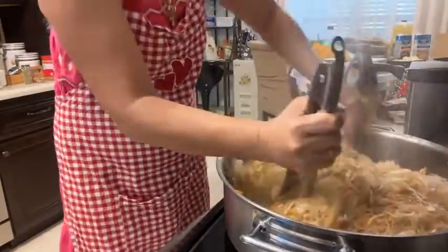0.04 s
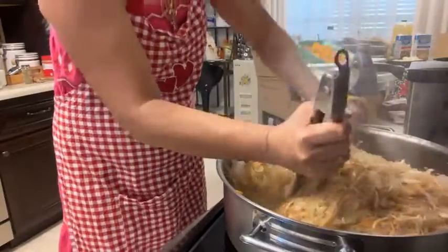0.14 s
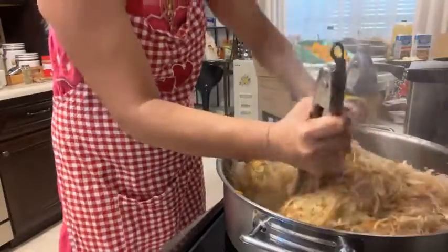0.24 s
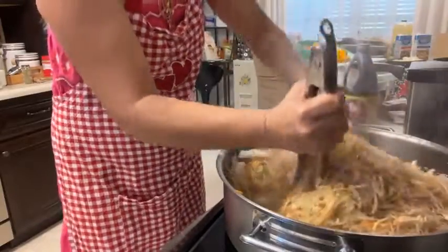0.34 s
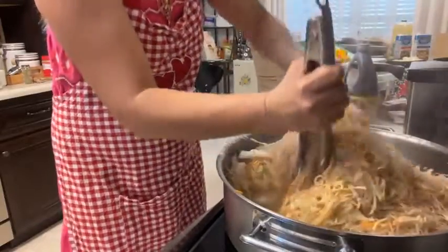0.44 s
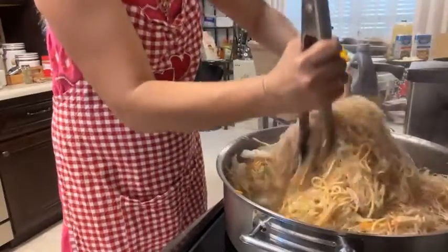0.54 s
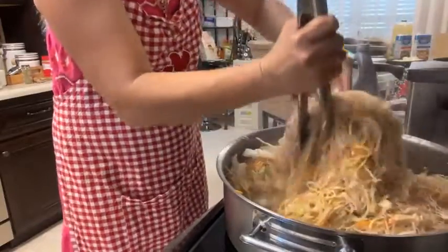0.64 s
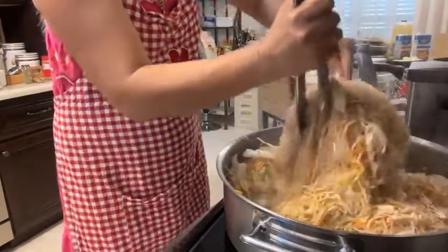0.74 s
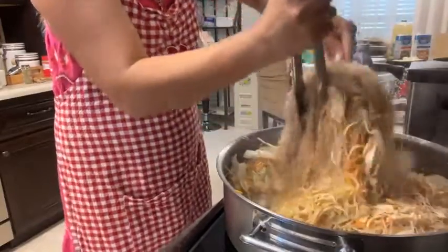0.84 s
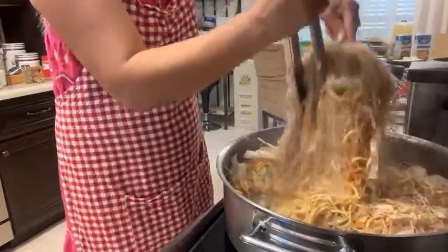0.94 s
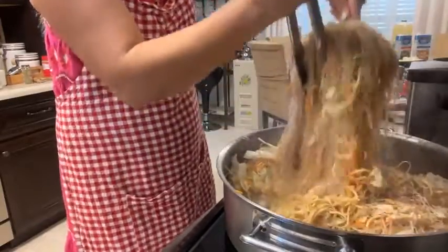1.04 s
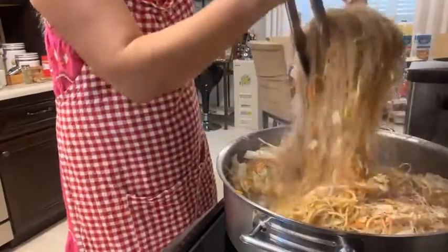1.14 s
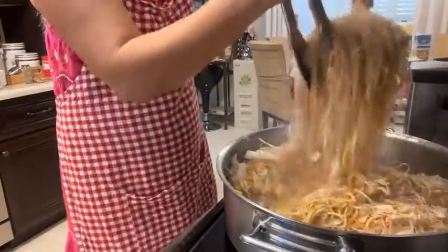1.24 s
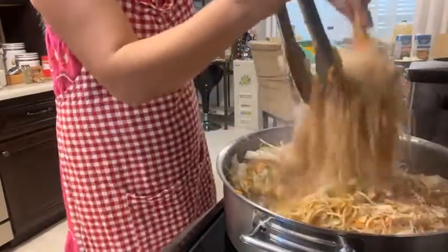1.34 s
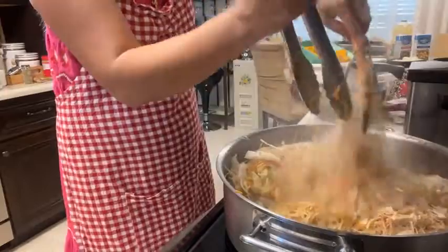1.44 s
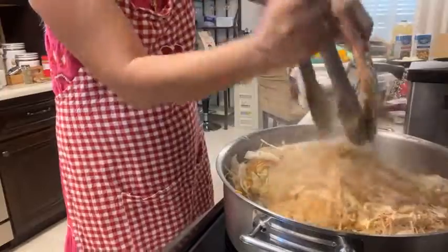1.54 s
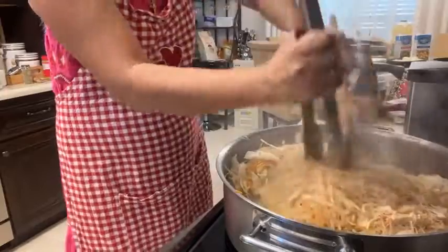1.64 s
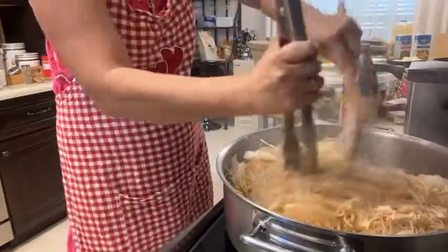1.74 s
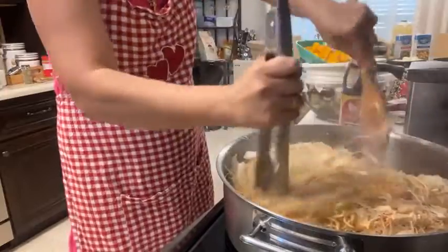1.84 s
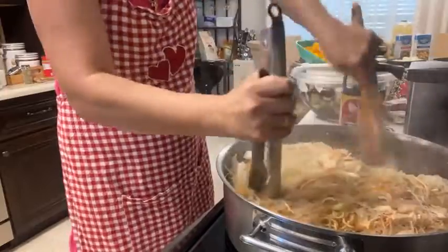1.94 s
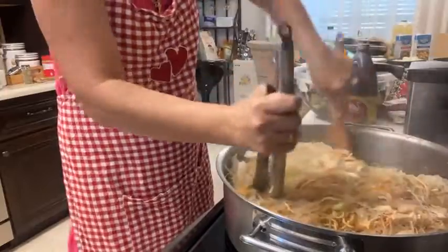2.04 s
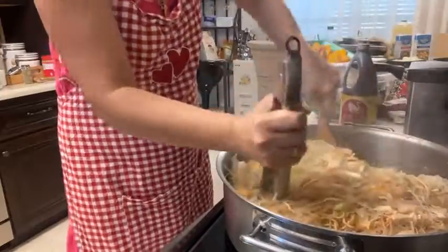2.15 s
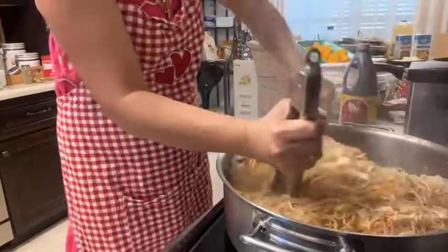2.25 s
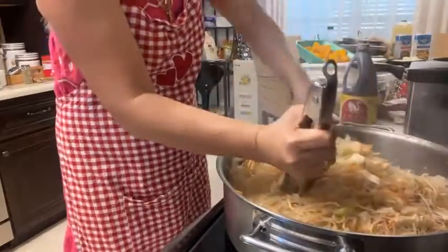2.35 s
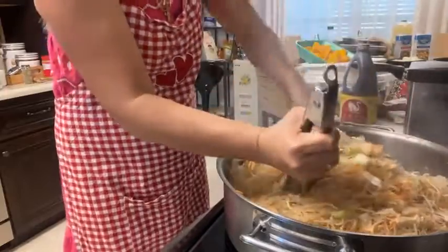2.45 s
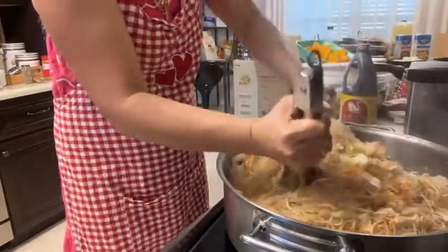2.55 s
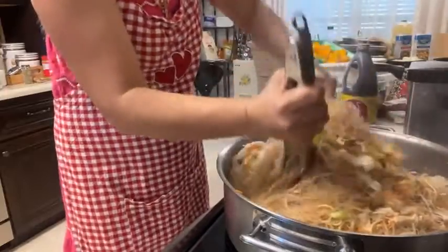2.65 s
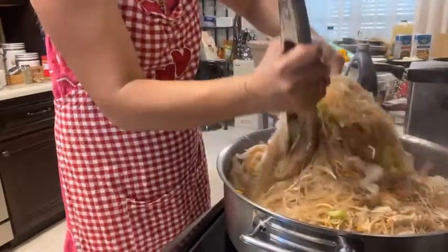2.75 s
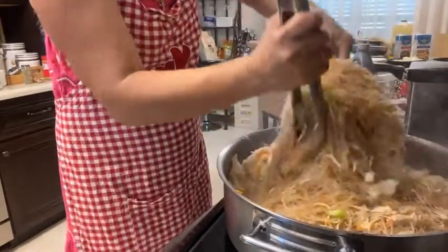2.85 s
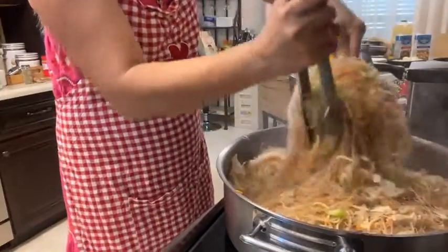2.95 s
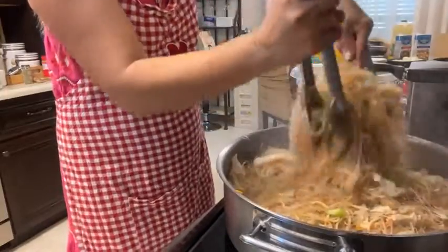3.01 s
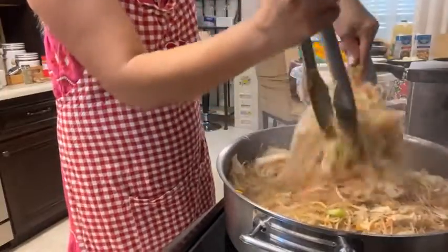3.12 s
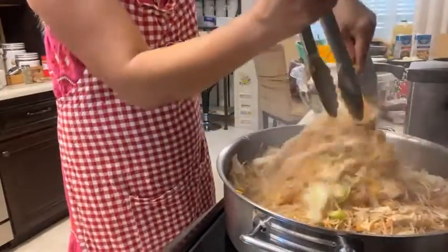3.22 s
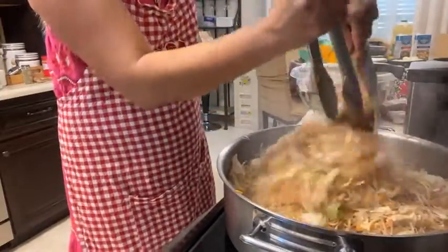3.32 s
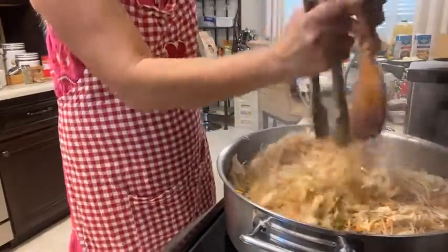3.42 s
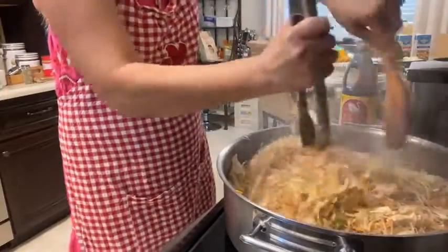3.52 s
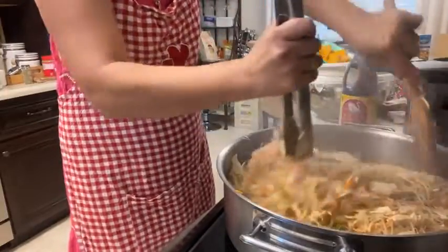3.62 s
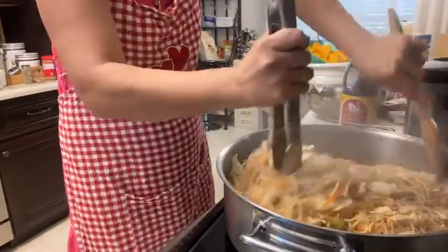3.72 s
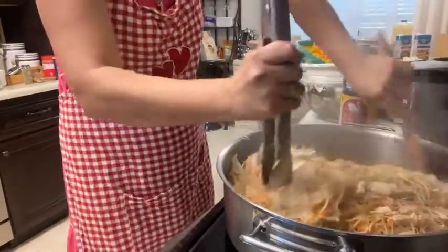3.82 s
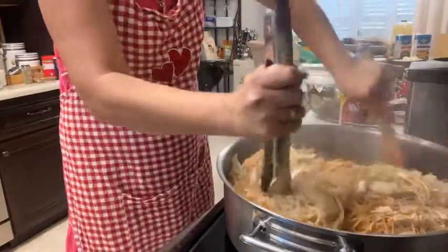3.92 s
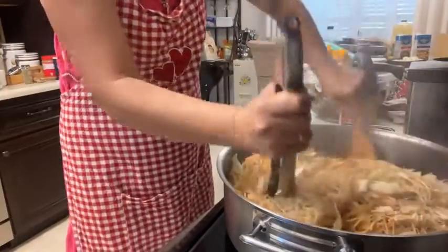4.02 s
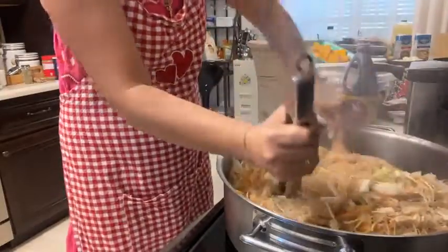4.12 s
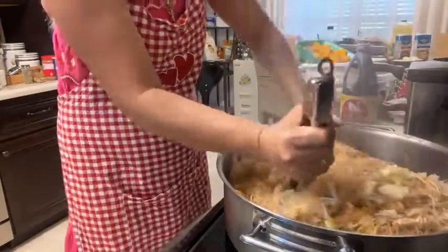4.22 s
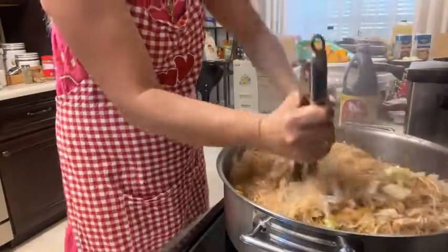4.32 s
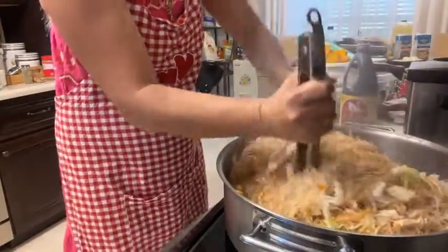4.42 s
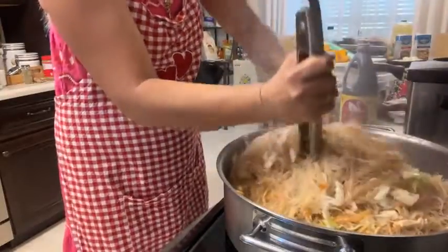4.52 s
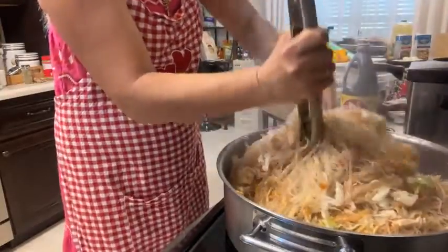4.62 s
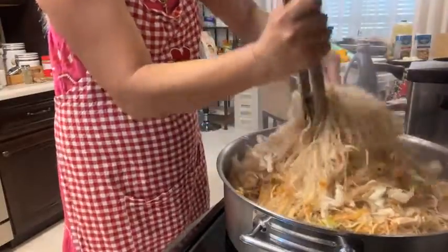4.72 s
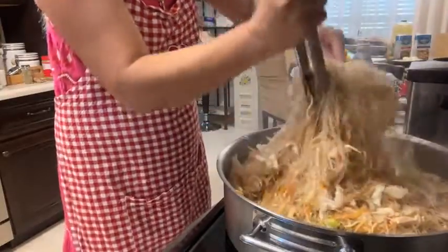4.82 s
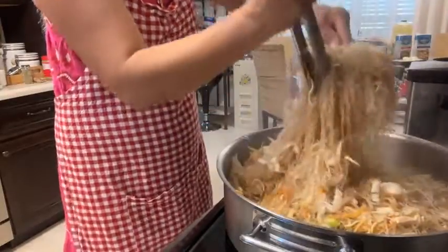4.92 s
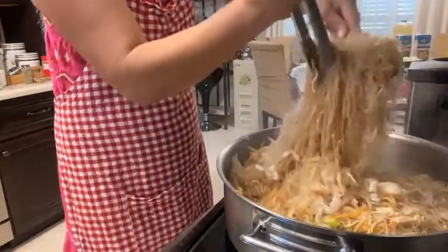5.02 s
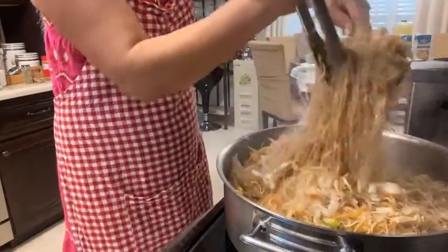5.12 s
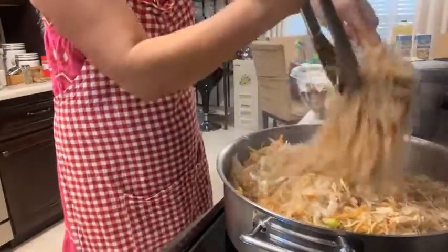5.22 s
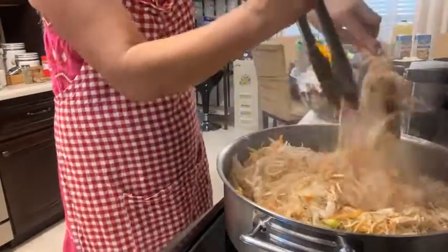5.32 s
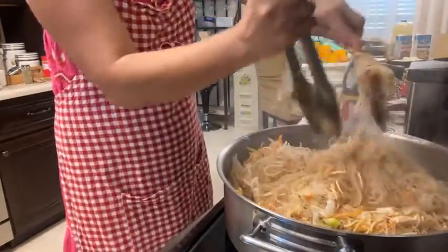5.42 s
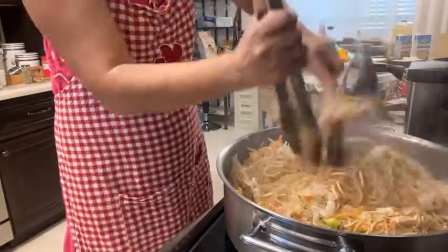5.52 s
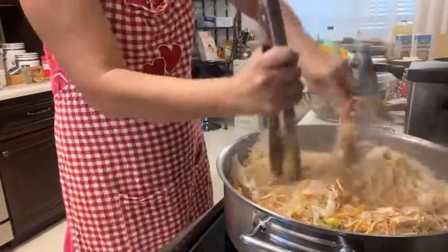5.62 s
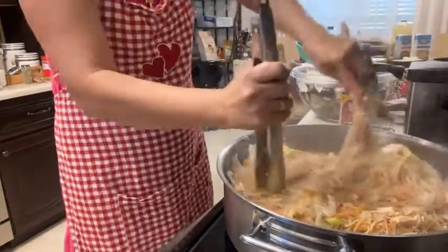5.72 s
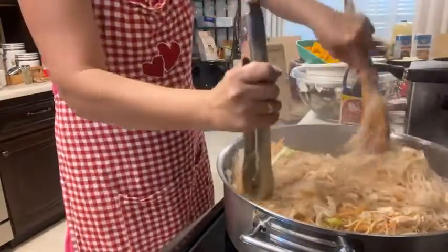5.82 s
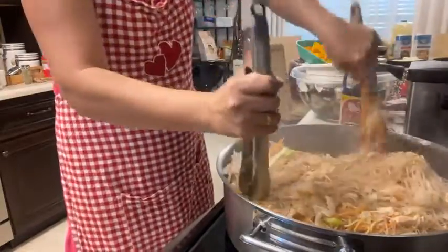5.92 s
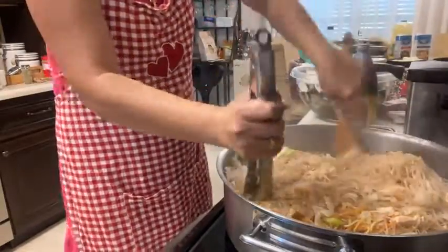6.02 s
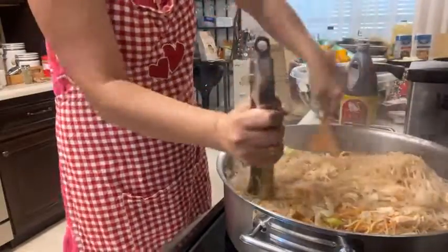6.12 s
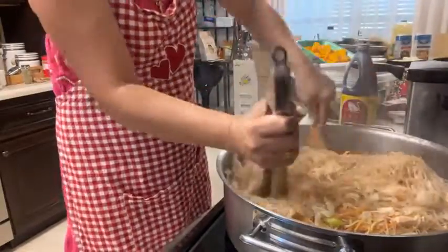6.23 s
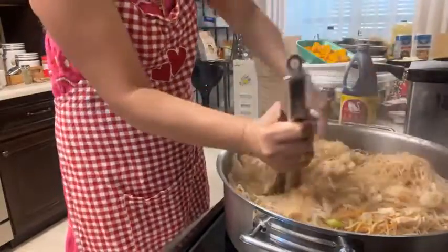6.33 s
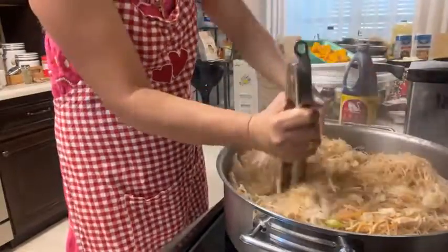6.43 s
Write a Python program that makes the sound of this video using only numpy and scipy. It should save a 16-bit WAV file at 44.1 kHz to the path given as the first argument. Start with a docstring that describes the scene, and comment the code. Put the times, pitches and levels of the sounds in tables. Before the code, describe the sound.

Metal tongs clank and scrape in a large steel pot, a wooden spatula knocks its wall, over steady sizzle and fan rush in a kitchen.

```python
"""Steel tongs toss noodles in a large steel pot: at each plunge they clank on the base, and a scrape follows.
Before two of the plunges a wooden spatula knocks on the wall; each blow makes the pot thump on its grate. Blows
are short bursts of noise plus dying sine waves; scrapes are rows of tiny random clicks. Between plunges the
tongs rattle lightly and the noodles squelch once. Filtered noise makes the fan rush and the rumble, fine clicks
the sizzle, and two steady tones beat as mains hum and a motor."""
import sys
import numpy as np
from scipy import signal
from scipy.fft import rfft, irfft, next_fast_len
from scipy.io import wavfile
from scipy.ndimage import uniform_filter1d

SR = 44100
rng = np.random.default_rng(int(sys.argv[2]) if len(sys.argv) > 2 else 0)


def unload_audio(sound):
    """Save the sound as a 16-bit wav file, at the path given as the first command line argument."""
    columns = np.transpose(np.atleast_2d(sound))
    # keep every value between -1 and 1, then stretch to whole-number steps
    steps = np.round(np.clip(columns, -1, 1) * 32767)
    wavfile.write(sys.argv[1], SR, steps.astype(np.int16))


N = 284886
TIME = np.arange(N) / SR  # seconds, whole scene
BLOW_TIME = TIME[:SR * 3 // 4]  # seconds, one blow

# tongs on the pot base: [t/s, level/dB, brightness/dB per octave, pot ring/dB,
# region favoured by the contact point f/Hz, its lift/dB, thump on the grate/dB]
BASE_CLANKS = [(0.0, -23.5, -1, 0.5, 754, 7.5, -26), (2.125, -9, -0.25, -7, 960, 4, -21.5),
               (4.2004, -23, 0.1, -8, 4300, 4.5, -39), (6.108, -15, 0.9, -12, 2940, 5, -24.5)]
# wooden spatula on the pot wall: same columns as the clanks
WALL_KNOCKS = [(2.0169, -13, 1, -1, 1255, 7, -25), (6.036, -20.5, -1, -0.5, 3000, 3, -34.5)]
# ways the pot rings: [f/Hz, level/dB, time to fall 60 dB/s, rise time/s]
POT_MODES = [(426, -3.5, 0.056, 0.0066), (388, -19, 0.07, 0.0016), (592, -26, 0.083, 0.0032),
             (642.4, -18.5, 0.22, 0.0019), (763, -28.5, 0.31, 0.0045), (861, -22, 0.35, 0.0096),
             (907, -26.5, 0.29, 0.0018), (1042, -14, 0.15, 0.00048), (1233, -20.5, 0.13, 0.0013),
             (1245, -13, 0.057, 0.0015), (1357, -49, .25, 0.0017), (1473, -21, 0.14, 0.00041),
             (2336, -34, 0.39, 0.0011)]
# dense short-lived vibrations of a steel contact: [f/Hz, level/dB, time to fall 60 dB/s]
STEEL_CRACK_BANDS = [(100, -15, 0.15), (393, 5.5, 0.053), (820, 1, 0.13), (1180, 2.5, 0.041),
                     (1910, -5, 0.09), (3700, -5, 0.042), (6760, -5.5, 0.04), (7900, -13, 0.049),
                     (11700, -17, 0.031), (13200, -8.5, 0.03), (15700, -23, 0.034)]
# the steel tips skip over each other: [t/s, level/dB, number of touches]
TIP_SKIPS = [(.208, -37.5, 1), (1.608, -40, 1), (3.388, -41, 3), (3.564, -46, 1)]
SKIP_S = 0.0265  # seconds from one touch to the next
TIP_TOP_HZ = 14000  # upper region in which the tips ring
# colour of frying and spitting fat: [f/Hz, level/dB]
FRYING_COLOUR = [(1000, -27.5), (2700, -9.5), (3500, -0.5), (4500, -2.5), (5500, -1), (7300, -4),
                 (8300, -10.5), (11000, -14.5), (13000, -8), (14500, -10), (16000, -16)]


def tongs(crack_db=18, steel_db=-1, snap_db=8, snap_s=0.00056):
    """Steel tips hit the base with a hard snap; the food damps the pot quickly."""
    # ways the tongs ring: [f/Hz, level/dB, time to fall 60 dB/s, rise time/s]
    tongs_modes = [(1240, -3.5, 0.026, 0.001), (2260, -6, 0.033, 0.00026), (2630, -8.5, 0.015, 0.000057),
                   (2890, -9, 0.022, 0.00045), (4740, -12, .04, 0.00031), (4730, -31, 0.06, 0.00019),
                   (5200, -22, 0.027, 0.00031), (6624, -18, 0.058, .0002), (6516, -16.5, 0.029, 0.00009),
                   (6950, -39, 0.065, .0002), (8500, -21, .04, .0002), (14400, -31, .01, 0.0003)]
    out = np.zeros(N)
    snap = amp(snap_db * np.exp(-BLOW_TIME / snap_s))  # extra loudness at the very start
    for s, db, bright_db, pot_db, centre_hz, lift_db, _ in BASE_CLANKS:
        crack = amp(crack_db) * snap * dying(STEEL_CRACK_BANDS, cycles=1.34)
        blow = crack + amp(steel_db) * ring(tongs_modes) + amp(pot_db) * ring(POT_MODES)
        blow = tilted(blow, bright_db, pivot_hz=1480)
        add(out, s, amp(db) * contact(blow, centre_hz, lift_db))
    return out


def spatula(crack_db=21, wood_db=-2, soft_hz=6500):
    """Wood cracks and rings briefly; the pot wall answers. The soft contact gives little top."""
    # ways the spatula rings: [f/Hz, level/dB, time to fall 60 dB/s, rise time/s]
    spatula_modes = [(429.5, -0.5, 0.04, 0.0127), (1029, 0.5, 0.082, 0.0098), (1051, -24, 0.12, 0.021),
                     (1124, -10, 0.053, 0.0021), (1304, -9, 0.024, 0.002), (1784, -8, .045, 0.0003),
                     (1890, -10, 0.056, 0.00042), (2460, -16.5, 0.13, 0.00092), (2644, -12, 0.069, 0.0028),
                     (3470, -34.5, 0.042, .0005), (4120, -33, 0.053, 0.00071), (4920, -10, 0.06, 0.00024)]
    # dense short-lived vibrations of the wood: [f/Hz, level/dB, time to fall 60 dB/s]
    wood_crack_bands = [(150, -21, 0.065), (594, -8, 0.33), (1200, 4, 0.019), (2800, -3, 0.067),
                        (4900, -5.5, 0.051), (5540, -16.5, 0.029), (9000, -24, 0.028), (16000, -38, .04)]
    out = np.zeros(N)
    for s, db, bright_db, pot_db, centre_hz, lift_db, _ in WALL_KNOCKS:
        crack = amp(crack_db) * dying(wood_crack_bands, cycles=0.58)
        blow = crack + amp(wood_db) * ring(spatula_modes) + amp(pot_db) * ring(POT_MODES)
        blow = tilted(blow, bright_db, pivot_hz=990)
        add(out, s, amp(db) * contact(blow, centre_hz, lift_db))
    return signal.lfilter(*signal.butter(1, soft_hz, fs=SR), out)


def contact(x, centre_hz, lift_db, octaves=0.34):
    """The point of contact favours the modes of one region."""
    return colour(x, lambda hz: lift_db * np.exp(-(np.log2((hz + 1) / centre_hz) / octaves) ** 2))


def thumps(lowest_hz=52):
    """The whole pot bounces on the grate just after each blow, or when shoved, then rebounds once."""
    # ways the pot and grate thump: [f/Hz, level/dB, time to fall 60 dB/s, rise time/s]
    grate_modes = [(65, -14, 0.082, 0.009), (108, -2.5, 0.13, 0.0041), (164.2, 0, 0.071, 0.0025),
                   (208, -2.5, 0.031, 0.0027), (428.6, -16.5, 0.092, 0.0016)]
    # pushing into the food rocks the pot without a blow: [t/s, level/dB, brightness/dB per octave]
    food_shoves = [(3.833, -51, 12), (3.981, -37.5, -8.5), (6.079, -22, 0.5)]
    wall_lag_s, base_lag_s = 0.0138, 0.00562
    rebound_s, rebound_db = 0.0246, -10
    wall_tilt = 3.8  # dB per octave, for a sideways knock
    # a full thump has this level and tilt (dB per octave); each dB less adds some tilt, so it sounds higher
    full_db, full_tilt, tilt_per_db = -20.5, -4, 0.5528

    landings = [(s + wall_lag_s, db, wall_tilt) for s, *_, db in WALL_KNOCKS]
    for s, *_, db in BASE_CLANKS:
        landings.append((s + base_lag_s, db, full_tilt + tilt_per_db * (full_db - db)))
    out = np.zeros(N)
    for s, db, bright_db in landings + food_shoves:
        thump = amp(db) * tilted(ring(grate_modes), bright_db, pivot_hz=136)
        add(out, s, thump)
        add(out, s + rebound_s, amp(rebound_db) * thump)
    return signal.sosfilt(signal.butter(2, lowest_hz, "highpass", fs=SR, output="sos"), out)


def scrapes(taper=0.64):
    """Tiny slips hiss and excite the resonances of the tongs: steel on steel, except at 2.17 s, where the
    spatula is pushed down."""
    # strokes scraping along the pot (the dark one at 2.17 s is the spatula pushed down): [t/s, length/s,
    # level/dB, brightness/dB per octave, squeal/dB]
    drags = [(0.0, 0.049, -39.5, 3, -7.5), (0.027, 0.23, -43.5, -1, -6), (2.17, 0.32, -52, -3.5, -5),
             (4.224, 0.083, -54, -6.5, 4.5), (6.208, .16, -44.5, -1.4, 5)]
    # colour of the hiss: [f/Hz, level/dB]
    hiss_colour = [(100, -25), (400, -3), (800, 1.5), (1300, 9), (1800, -2.5), (4500, -2), (7000, -14.5),
                   (9000, -30), (14000, -24), (16000, -33)]
    # resonances of the tongs while pressed on the steel: [f/Hz, width/Hz, level/dB]
    pressed_resonances = [(850, 24, -13), (1140, 36, -9), (1264, 23, 6), (1495, 9.2, 17), (2110, 77, 13),
                          (2620, 66, 9.5), (2827, 64, 14), (4260, 240, 11.5), (4500, 130, 6),
                          (5400, 290, -1), (6380, 190, 9.5), (7640, 360, -29)]
    out = np.zeros(N)
    for s, length, db, bright_db, squeal_db in drags:
        size = int(length * SR)
        fade = signal.windows.tukey(size, np.clip(taper, 0, 1))
        slips = np.zeros(len(BLOW_TIME))
        add(slips, 0, grains(size, per_s=14000, spread_db=2.5) * fade)
        hiss = colour(slips, lambda hz: read(hiss_colour, hz))
        squeal = sum(amp(peak_db) * signal.lfilter(*signal.iirpeak(hz, hz / width, SR), slips)
                     for hz, width, peak_db in pressed_resonances)
        stroke = (evened(hiss) + amp(squeal_db) * evened(squeal)) * slips.std()
        add(out, s, amp(db) * tilted(stroke, bright_db, pivot_hz=2020))
    return out


def rattle(tick_db=21):
    """The loose tongs: dull taps, ringing clacks of the arms, and bright skips of the tips."""
    # tongs let go of the noodles and tap the spatula: [t/s, level/dB, centre f/Hz]
    spatula_taps = [(1.5971, -36.5, 1050), (3.3648, -30, 430), (3.394, -36.5, 800)]
    # the arms clack shut: [t/s, level/dB]
    arm_clacks = [(1.625, -38), (3.4162, -32)]
    clack_hz, tip_hz, tip_top_db = 2970, 7540, -5
    out = np.zeros(N)
    for s, db, centre_hz in spatula_taps:
        add(out, s, amp(db) * touch(centre_hz, octaves=2.3, arms_db=-18, grip_t60=0.08))
    for s, db in arm_clacks:
        add(out, s, amp(db) * touch(clack_hz, octaves=0.79, arms_db=-3, grip_t60=0.24))
    for s, db, count in TIP_SKIPS:
        for k in range(round(count)):
            tips = touch(tip_hz, octaves=0.66, arms_db=-6, grip_t60=0.3)
            tips += amp(tip_top_db) * touch(TIP_TOP_HZ, octaves=0.64, arms_db=-6, grip_t60=0.3)
            add(out, s + k * SKIP_S, amp(db) * tips)
    return amp(tick_db) * out


def touch(centre_hz, octaves, arms_db, grip_t60, crack_db=24, rise=0.00032):
    """A light touch wakes one region of the arms' modes, and the grip damps its crack; energy 1."""
    # the free arms ringing in the air: [f/Hz, level/dB, time to fall 60 dB/s, rise time/s]
    arm_modes = [(890, 2, 0.065, 0.00087), (2510, -12.5, 0.16, 0.00076), (2660, -3, 0.038, .001),
                 (2950, -8.5, 0.073, .001), (4810, -10, .06, 0.0011), (6480, -14, 0.081, 0.0011),
                 (7230, -11, 0.078, 0.002)]
    crack = amp(crack_db - 60 * BLOW_TIME / grip_t60) * dying(STEEL_CRACK_BANDS, cycles=0.73)
    x = (crack + amp(arms_db) * ring(arm_modes)) * np.minimum(BLOW_TIME / rise, 1)
    x = colour(x, lambda hz: -20 * np.log10(1 + (np.log2((hz + 1) / centre_hz) / octaves) ** 2))
    return x / np.linalg.norm(x)


def slides(width_hz=1800, slide_db=-51):
    """From the first skip to the last the tips stay in light contact and hiss thinly, ever louder."""
    out = np.zeros(N)
    for s, _, count in TIP_SKIPS:
        if round(count) > 1:
            size = int((round(count) - 1) * SKIP_S * SR)
            slips = grains(size, per_s=12000, spread_db=1.5)
            hiss = signal.lfilter(*signal.iirpeak(TIP_TOP_HZ, TIP_TOP_HZ / width_hz, SR), slips)
            add(out, s, amp(slide_db) * evened(hiss * np.linspace(0, 1, size) ** 0.5))
    return out


def squelch():
    """Small wet pops swell as the tongs push the noodles down, and fade quickly as they let go."""
    # colour of the wet pops: [f/Hz, level/dB]
    wet_colour = [(300, -5), (1000, -3), (3000, -0.5), (6500, -1), (9000, -8), (14000, -9.5), (16000, -8)]
    # moment of most pressure, level, time to press and time to let go
    press_s, press_db, rise_s, release_s = 4.04, -47.5, 0.15, 0.071
    pops = colour(grains(N, per_s=8000, spread_db=-5.0), lambda hz: read(wet_colour, hz))
    width = np.where(TIME < press_s, rise_s, release_s)
    return amp(press_db) * evened(pops) * np.exp(-((TIME - press_s) / width) ** 2)


def spits(t60=0.0049):
    """Single droplets of fat burst on the hot steel with a tiny dry tick."""
    # droplets: [t/s, peak level/dB]
    droplets = [(2.6864, -41), (3.9096, -33)]
    out = np.zeros(N)
    for s, db in droplets:
        burst = rng.standard_normal(len(BLOW_TIME)) * amp(-60 * BLOW_TIME / t60)
        pop = colour(burst, lambda hz: read(FRYING_COLOUR, hz))
        add(out, s, amp(db) * pop / abs(pop).max())
    return out


def stove(fan_db=-56, sizzle_db=-55.5, rumble_db=-60):
    """Fan rush below, fine frying crackle above, and a low rumble."""
    # colour of the fan rush: [f/Hz, level/dB]
    fan_colour = [(150, -31), (220, 0), (280, -8), (330, 2), (390, -4.5), (470, 5.5), (545, -3), (900, 0.5),
                  (1120, -2), (1500, 0), (2000, 1), (2700, -4.5), (3600, -4.5), (5500, -2)]
    # colour of the rumble: [f/Hz, level/dB]
    rumble_colour = [(20, -33), (45, -11), (65, 2), (90, -6), (140, 4), (200, -6.5), (300, -19)]
    rush_db, frying_db = tossing()
    air = colour(rng.standard_normal(N), lambda hz: read(fan_colour, hz))
    air = signal.sosfilt(signal.butter(3, 2900, fs=SR, output="sos"), air)
    air = evened(flutter(air, patchy_db=2.15))
    frying = colour(grains(N, per_s=14000, spread_db=-2.5), lambda hz: read(FRYING_COLOUR, hz))
    frying = evened(flutter(frying, patchy_db=2.6))
    air *= amp(fan_db + rush_db)
    frying *= amp(sizzle_db + frying_db)
    rumble = evened(colour(rng.standard_normal(N), lambda hz: read(rumble_colour, hz)))
    return air + frying + amp(rumble_db) * rumble


def tossing():
    """Levels in dB of rush and sizzle: both jump at a plunge, then creep up; falling noodles add sizzle."""
    # each toss starts with a plunge: [t/s, level of the rush/dB, swell of the sizzle/dB (below 0: none)]
    plunges = [(0, 0.5, 0.5), (2.125, -2, 0), (4.2, -1.5, 2), (6.108, 1, -22)]
    recover_db_per_s = 0.96
    sizzle_follows = 0.66  # share of the rush's movement in the sizzle
    fall_back_s, fall_spread_s = 1.2, 0.46  # noodles drop back on the steel this long after the plunge
    start, level_db, swell_db = np.transpose(plunges)
    toss = np.searchsorted(start[1:], TIME)
    since = TIME - start[toss]
    rush_db = level_db[toss] + recover_db_per_s * since
    falling = np.exp(-((since - fall_back_s) / fall_spread_s) ** 2)
    return rush_db, sizzle_follows * rush_db + np.maximum(swell_db[toss], 0) * falling


def flutter(x, patchy_db):
    """Narrow regions of a rushing sound swell and fade at random."""
    z = signal.stft(x, nperseg=1024, noverlap=768)[2]
    patches = uniform_filter1d(rng.standard_normal(z.shape), size=4, axis=0)  # smooth over pitch
    patches = uniform_filter1d(patches, size=7, axis=1)  # smooth over time
    return signal.istft(z * amp(patchy_db * evened(patches)), nperseg=1024, noverlap=768)[1][:N]


def hum(hum_db=-54.5):
    """Mains hum and a slightly slower motor drift in and out of step."""
    mains_hz, beat_hz, quiet_s, motor_db = 120, 1.415, 4.5, -3.5  # they cancel most at quiet_s
    turn = 2 * np.pi * (TIME - quiet_s)
    motor = amp(motor_db) * np.sin((mains_hz - beat_hz) * turn)
    return amp(hum_db) * (np.sin(mains_hz * turn) - motor)


def kitchen(x, delay=0.008):
    """Close cupboards return a short, bright reverberation."""
    # how the room dies away: [f/Hz, level/dB, time to fall 60 dB/s]
    room_bands = [(60, -3.5, 1), (203, 0, 0.46), (516, 4, 0.36), (1210, -1, 0.41), (3000, -3, 0.46),
                  (6900, 1.5, 0.31), (14800, 1.5, 0.27)]
    out = np.zeros(N)
    add(out, delay, signal.fftconvolve(x, dying(room_bands)))
    return out


def ring(modes):
    """Damped sine waves, each building up over its own rise time and then dying away."""
    out = np.zeros(len(BLOW_TIME))
    for k, (hz, db, t60, rise) in enumerate(modes):
        decay = amp(db - 60 * np.maximum(BLOW_TIME - rise, 0) / t60)
        build_up = np.minimum(BLOW_TIME / rise, 1) ** 2
        out += (-1) ** k * decay * build_up * np.sin(2 * np.pi * hz * BLOW_TIME)
    return out


def dying(bands, cycles=0.47):
    """Dense taps of random sign; each band builds up over some cycles, dies at its own speed; energy 1."""
    taps = rfft(rng.choice([-1., 1.], len(BLOW_TIME)))
    hz = np.fft.rfftfreq(len(BLOW_TIME), 1 / SR)
    centres, _, t60s = np.transpose(bands)
    taps = taps * amp(read(bands, hz))
    out = np.zeros(len(BLOW_TIME))
    for share, centre, t60 in zip(np.eye(len(bands)), centres, t60s):
        # each band fades out towards its neighbours' centres
        band = irfft(taps * read(np.c_[centres, share], hz), len(BLOW_TIME))
        out += band * amp(-60 * BLOW_TIME / t60) * np.minimum(BLOW_TIME * centre / cycles, 1)
    return out / np.linalg.norm(out)


def grains(length, per_s, spread_db):
    """Random tiny clicks of uneven size."""
    size = amp(spread_db * np.minimum(rng.exponential(1, length), 5))
    return evened(size * rng.standard_normal(length) * (rng.random(length) < per_s / SR))


def colour(x, curve):
    """Filter without pre-echo whose gain in dB is curve(Hz)."""
    size = next_fast_len(len(x) + SR // 10)
    log_gain = np.log(amp(curve(abs(np.fft.fftfreq(size, 1 / SR)))) + 1e-5)
    response = np.exp(np.conj(signal.hilbert(log_gain)))  # minimum phase
    return np.fft.ifft(np.fft.fft(x, size) * response).real[:len(x)]


def tilted(x, slope_db, pivot_hz):
    """A harder contact lifts the treble, a softer one the bass, up to two octaves from the pivot."""
    return colour(x, lambda hz: slope_db * np.clip(np.log2((hz + 1) / pivot_hz), -2, 2))


def read(points, hz):
    """Reads a spectrum on a log-frequency axis."""
    f, value = np.transpose(points)[:2]
    return np.interp(np.log(hz + 1), np.log(f + 1), value)


def amp(db):
    """Decibels to gain."""
    return 10 ** (np.asarray(db) / 20)


def evened(x):
    """Scales to rms 1."""
    return x / np.sqrt(np.mean(x ** 2) + 1e-20)


def add(mix, s, sound):
    """Mixes a sound in at time s (seconds)."""
    part = mix[max(round(s * SR), 0):][:len(sound)]
    part += sound[:len(part)]


def scene(wood_room_db=-14, steel_room_db=-9.0, thump_room_db=-9, rattle_room_db=-8.5):
    """All sources, and the reverberation of the blows, scrapes and rattle, in one channel."""
    wood = spatula()
    steel = tongs() + scrapes()
    low = thumps()
    arms = rattle() + slides()
    to_room = amp(wood_room_db) * wood + amp(steel_room_db) * steel
    to_room += amp(thump_room_db) * low + amp(rattle_room_db) * arms
    contacts = wood + steel + low + arms + kitchen(to_room)
    return (contacts + stove() + spits() + squelch() + hum())[None]


def record(dry, edge_hz=15850):
    """Steeply cuts the treble above the band edge."""
    return signal.oaconvolve(dry, signal.firwin(511, edge_hz, window=("kaiser", 9), fs=SR)[None], "same")


dry = scene()
out = record(dry)
unload_audio(out)
```